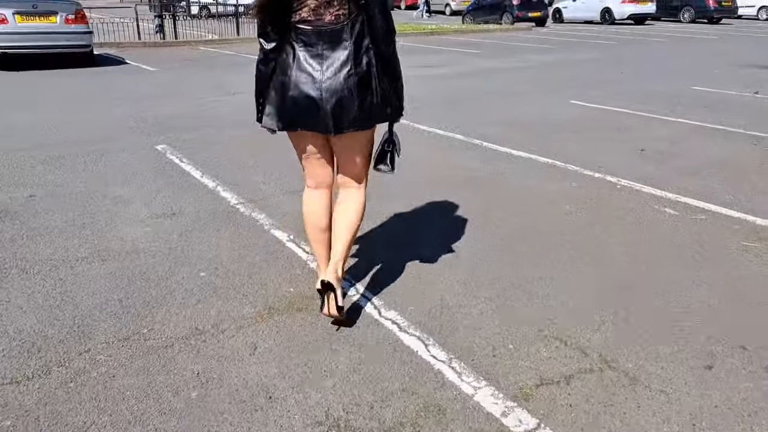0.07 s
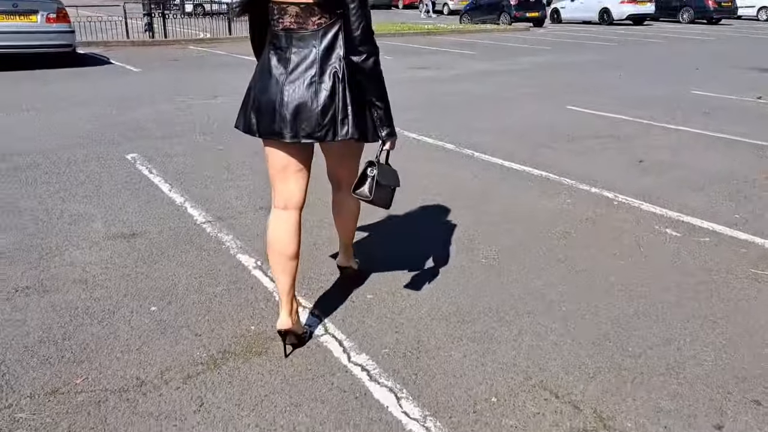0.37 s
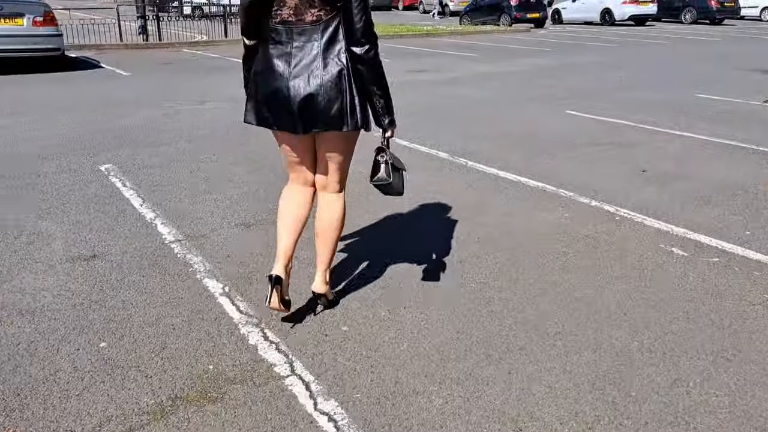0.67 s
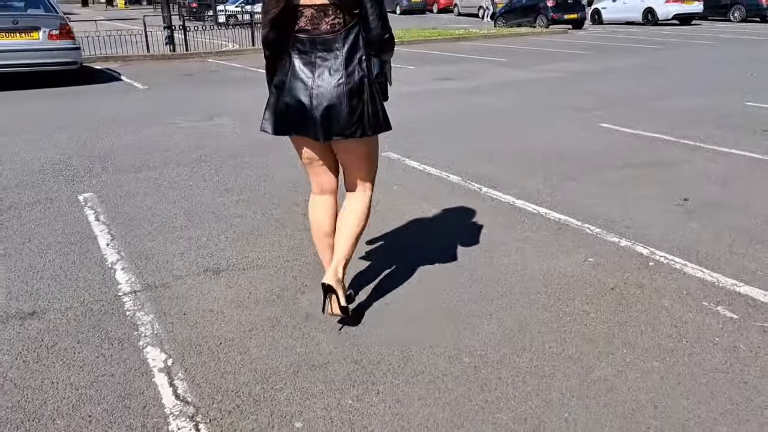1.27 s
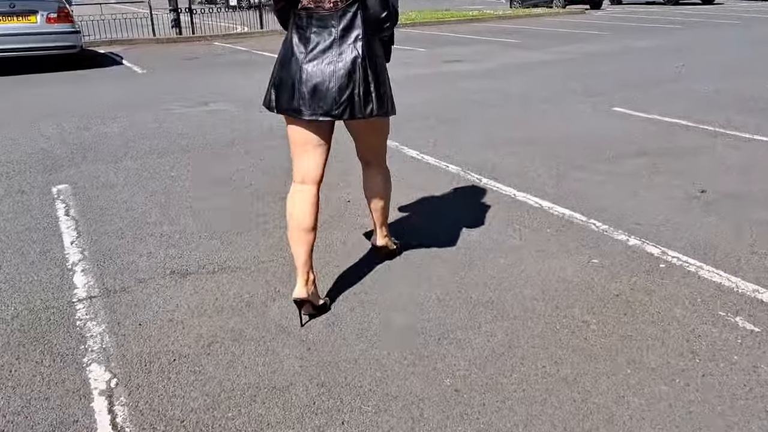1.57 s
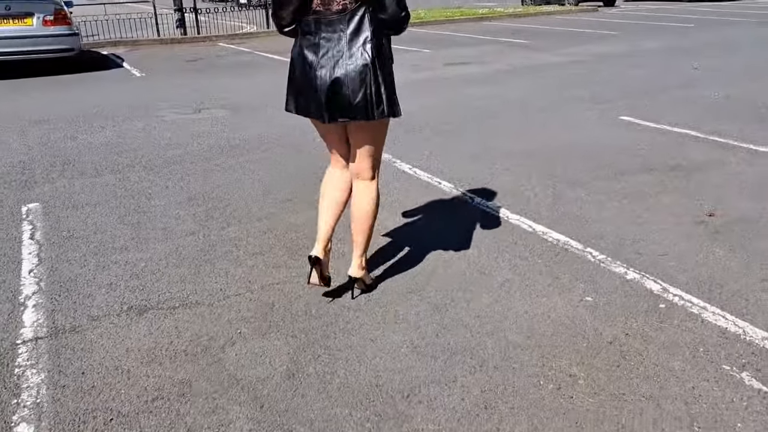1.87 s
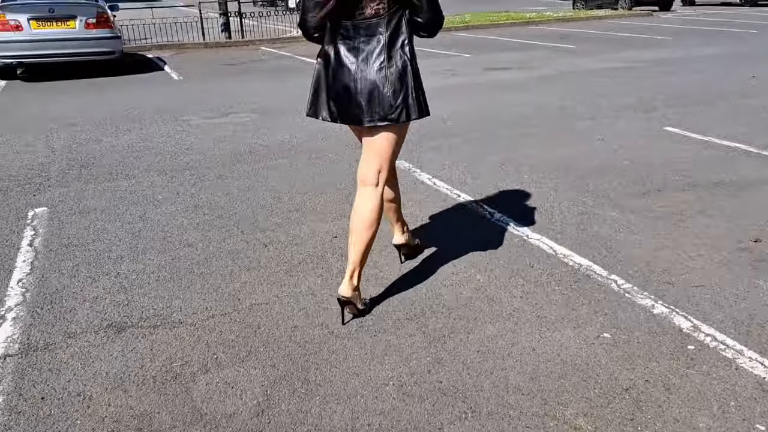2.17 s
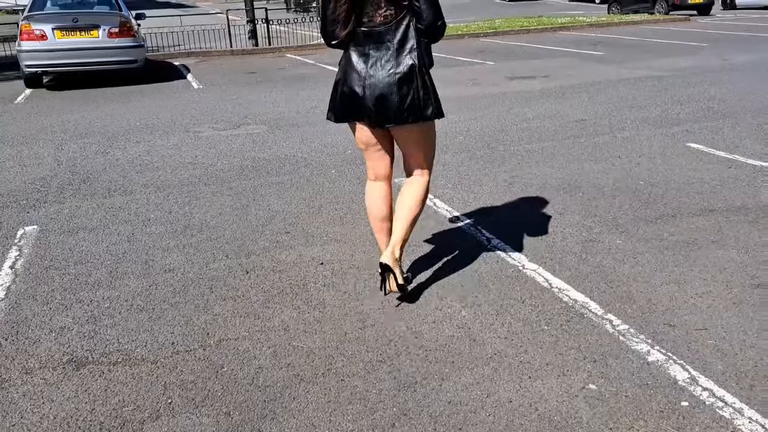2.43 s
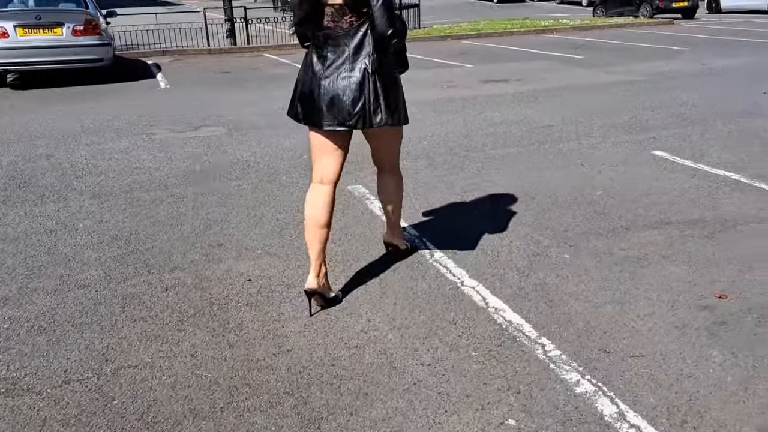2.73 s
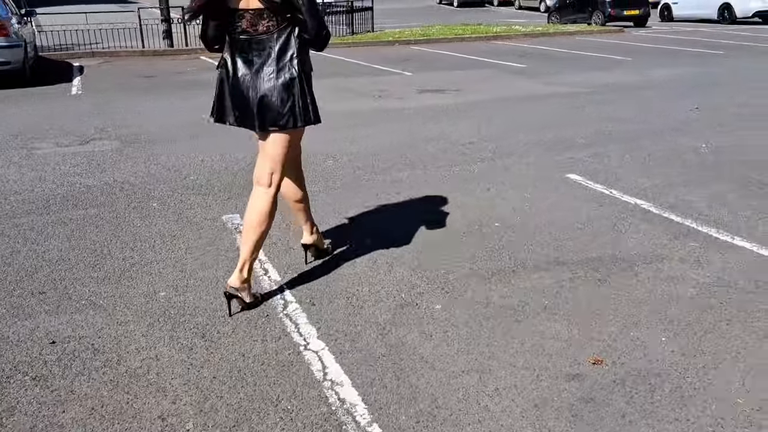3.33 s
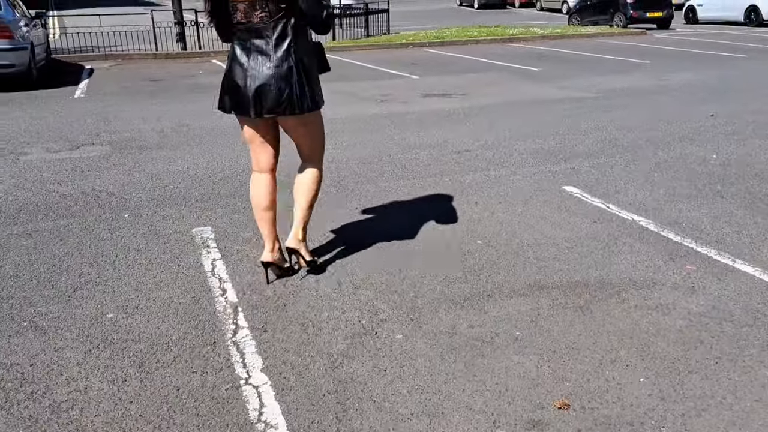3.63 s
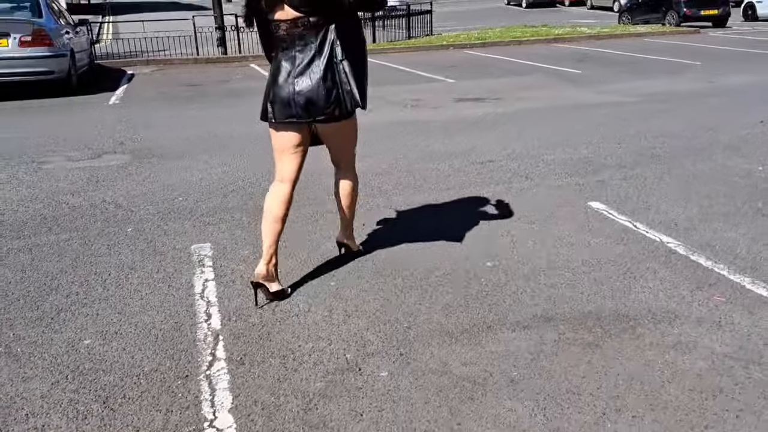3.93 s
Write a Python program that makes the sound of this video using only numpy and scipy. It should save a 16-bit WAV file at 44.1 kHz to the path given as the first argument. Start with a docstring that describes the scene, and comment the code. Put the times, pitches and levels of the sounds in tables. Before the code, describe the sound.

Light, sharp clicks of high heels move away over an outdoor car park, the soles scraping softly on grit. Far traffic hums underneath, while rising wind hits the microphone with low rumble and thuds.

```python
"""High heels click away over the asphalt of an open car park, with sole taps and gritty scuffs.
Each contact rings the heel, its hard tip and the grit under it. Wind rumbles on each microphone
port separately and, as the gust grows, slaps the ports in short buffets and deep thumps.
Distant traffic, a soft hiss and a few faint whistles lie underneath."""
import sys
import numpy as np
from scipy import signal
from scipy.fft import rfft, irfft
from scipy.io import wavfile
from scipy.ndimage import uniform_filter1d

SR = 44100
rng = np.random.default_rng(int(sys.argv[2]) if len(sys.argv) > 2 else 0)


def store_wav(level_fs):
    """Save 16-bit WAV to argv[1]."""
    pcm = np.round(np.clip(np.atleast_2d(level_fs), -1, 1) * 32767)
    wavfile.write(sys.argv[1], SR, pcm.T.astype(np.int16))


N = 176400

# Each row: start in seconds, body, tip and grit levels in dB, pitch factor.
SHOE_CONTACTS = [(0.0565, -29.5, -34, -24.5, .97), (0.062, -52, -54, -37, 0.89),
                 (0.1357, -53, -36.5, -34, 0.96), (0.5802, -38, -34.5, -54, 0.71),
                 (0.68, -30.5, -46, -38.5, 0.99), (1.3115, -60, -32, -37, 1.028),
                 (2.4737, -38.5, -31.5, -32.5, 1.04), (3.606, -68, -46, -37.5, 1.07),
                 (3.9770, -62, -50, -36.5, 1.07)]
# Heel body, hard tip, crushed grit. Each row: base frequency in Hz, T60 in seconds, relative dB.
BODY_MODES = [(1550, .006, -8), (2080, .008, -3), (2380, .014, 0)]
TIP_MODES = [(3160, 0.014, 0.5), (3580, 0.0068, 5), (4380, 0.0058, 6.5), (5940, 0.00071, -11)]
GRIT_MODES = [(6380, 0.0031, 1), (7750, 0.0029, 2), (9300, 0.00057, 7), (11000, 0.00034, 1)]


def heels():
    """Each contact is a sharp blow and a brief crunch that ring the shoe; then grit settles."""
    crunch_gain, crunch_s = .18, .0013
    settle_db, settle_s = -41, .016
    out, t = np.zeros((2, N + SR)), np.arange(SR // 10) / SR
    for start, *levels_db, pitch in SHOE_CONTACTS:
        i = int(start * SR)
        for side in range(2):
            crunch, grains = rng.standard_normal((2, len(t)))
            push = crunch_gain * crunch * np.exp(-t / crunch_s)
            push += undb(settle_db) * grains ** 3 / 2 * np.exp(-t / settle_s)
            push[0] += 1  # the blow
            for db, modes in zip(levels_db, (BODY_MODES, TIP_MODES, GRIT_MODES)):
                out[side, i:i + len(t)] += undb(db) * ring(push, modes, pitch)
    return out[:, :N] * pan(-1.5)


def ring(push, modes, pitch):
    """Damped modes driven by a push, band-passed around them; peak 1."""
    t = np.arange(len(push)) / SR
    response = sum(undb(db - 60 * t / t60) * np.sin(2 * np.pi * pitch * hz * t) for hz, t60, db in modes)
    skirt_ratio = 1.3
    low_hz = pitch * modes[0][0] / skirt_ratio
    high_hz = min(pitch * modes[-1][0] * skirt_ratio, SR / 2 - 1)
    band = signal.butter(2, [low_hz, high_hz], "band", fs=SR, output="sos")
    ringing = signal.sosfilt(band, signal.fftconvolve(push, response)[:len(t)])
    return ringing / np.abs(ringing).max()


# Each row: centre in seconds, half length in seconds, level in dB.
SOLE_SCUFFS = [(0.323, 0.015, -64), (1.145, 0.018, -61), (1.71, 0.046, -64), (1.788, 0.0091, -52.5),
               (2.301, 0.014, -56.5), (2.425, 0.083, -61.5), (2.893, 0.039, -60), (3.025, 0.016, -57.5),
               (3.635, 0.021, -64)]
# Each row: frequency in Hz, relative level in dB.
SCUFF_SPECTRUM = [(1500, -10), (4000, 4), (8000, 10.5), (10000, 10), (13500, 3.5), (16000, -19)]


def scuffs():
    """Soles rub over fine grit in short grainy swishes."""
    rub = sum(undb(db) * swell(centre, half) for centre, half, db in SOLE_SCUFFS)
    grain = flicker(rate_hz=980, depth_db=7)
    return rub * grain * np.array([noise(SCUFF_SPECTRUM), noise(SCUFF_SPECTRUM)])


# Wind on the ports. Each row: time in seconds, level in dB.
RUMBLE_LEFT = [(0, -39.5), (.56, -34.5), (.75, -42.5), (1.08, -36.5), (1.29, -23.5), (1.38, -30.5),
               (1.47, -40.5), (1.65, -32.5), (2.0, -29.5), (2.28, -24), (2.42, -29.5), (2.6, -23),
               (3.0, -28.5), (3.28, -32), (3.43, -21.5), (3.65, -29), (3.83, -38), (3.95, -25.5)]
RUMBLE_RIGHT = [(0, -37), (.38, -47), (.55, -35), (.75, -51.5), (.87, -41), (1.0, -44), (1.14, -27.5),
                (1.3, -31.5), (1.39, -33), (1.45, -93), (1.85, -38.5), (2.08, -30.5), (2.27, -27.5),
                (2.53, -28.5), (2.8, -44), (2.96, -68), (3.44, -52), (3.61, -31.5), (3.82, -88),
                (3.94, -28), (4, -34)]
FLUTTER_LEVEL = [(0, -55), (1.1, -59.5), (1.25, -48.5), (1.7, -50.5), (2.1, -60), (2.25, -39), (2.45, -48),
                 (2.75, -38.5), (2.95, -50), (3.04, -39.5), (3.11, -32.5), (3.22, -46), (3.31, -33),
                 (3.35, -45), (3.41, -22), (3.47, -24.5), (3.51, -35), (3.55, -23.5), (3.59, -49),
                 (3.9, -41.5)]
# Each row: frequency in Hz, relative level in dB.
RUMBLE_SPECTRUM = [(20, -9), (40, -9), (62, 3), (90, -8), (130, -1), (200, -9), (300, -14.5), (450, -24),
                   (700, -47.5), (1500, -85), (4000, -111)]
FLUTTER_SPECTRUM = [(100, -46), (220, -22.5), (320, 3.5), (440, 2), (600, -5), (850, -15), (1300, -26),
                    (2000, -38), (4000, -89)]


def wind():
    """Independent turbulence on each port: lumpy rumble and a higher flutter, mostly on the right."""
    rumble = np.array([curve(port) * turbulence(RUMBLE_SPECTRUM, rate_hz=40, depth_db=5)
                       for port in (RUMBLE_LEFT, RUMBLE_RIGHT)])
    flutter = np.array([undb(port_db) * turbulence(FLUTTER_SPECTRUM, rate_hz=90, depth_db=8.5)
                        for port_db in (-16, 0)])
    return rumble + curve(FLUTTER_LEVEL) * flutter


def turbulence(spectrum, rate_hz, depth_db, gust_s=.084):
    """Noise that is lumpy from moment to moment but even in strength over the span of a gust."""
    lumps = noise(spectrum) * flicker(rate_hz, depth_db)
    power = smooth(lumps ** 2, int(gust_s * SR))
    return lumps / np.sqrt(np.abs(power) + 1e-9)


# Each row: centre in seconds, half length in seconds, left and right levels in dB.
EDDY_SLAPS = [(2.35, 0.0029, -30, -31.5), (2.812, .004, -42, -33.5), (2.91, 0.0045, -55, -30),
              (3.003, 0.0026, -38.5, -24.5), (3.269, 0.0034, -31.5, -20.5), (3.408, 0.0033, -23.5, -17.5),
              (3.436, 0.0037, -18.5, -15.5), (3.547, 0.0036, -62, -29), (3.629, 0.0067, -59, -34),
              (3.734, 0.0023, -53, -31.5), (3.788, 0.003, -61, -34.5), (3.854, 0.0036, -56, -34),
              (3.952, 0.011, -34, -36)]


def buffets():
    """Eddies hit the ports with a hollow thud and a rough wake; small, one-sided ones are brighter."""
    port_hz, port_gain = 403, 1.05
    wake_db, wake_s = -10.5, .034
    out, t = np.zeros((2, N)), np.arange(N) / SR
    for centre, half, left_db, right_db in EDDY_SLAPS:
        envelope = swell(centre, half)
        onset = (1 + np.tanh((t - centre) / half)) / 2
        wake = undb(wake_db) * onset * np.exp(-np.abs(t - centre) / wake_s)
        treble_db = .4 * abs(right_db - left_db)
        spectrum = [(hz, db + treble_db * np.clip(np.log2(hz / 500), 0, 1))
                    for hz, db in FLUTTER_SPECTRUM]
        resonance = port_gain * np.sin(2 * np.pi * (port_hz * t + rng.random()))
        for side, db in enumerate((left_db, right_db)):
            air = noise(spectrum)
            thud = envelope * (air + resonance)
            thud *= np.sqrt(np.sum(envelope ** 2) / np.sum(thud ** 2))
            out[side] += undb(db) * (thud + wake * air)
    return out


# Each row: centre in seconds, frequency in Hz, level in dB.
LARGE_EDDIES = [(0.331, 90, -30), (.54, 170, -28), (.6, 70, -27), (.885, 70, -31.5), (1.286, 59.9, -21.5),
                (2.251, 60, -17), (2.312, 74.7, -16), (2.485, 110, -23), (2.59, 180, -21.5),
                (2.791, 139.6, -17), (3.266, 70.3, -23.5), (3.412, 200, -15), (3.708, 307, -28.5),
                (3.915, 227.8, -24), (3.948, 180, -19.5)]


def thumps():
    """Large eddies roll over the whole microphone: a cycle or two of deep pressure swing."""
    t, half_length_cycles = np.arange(N) / SR, .4
    pressure = np.zeros(N)
    for centre, hz, db in LARGE_EDDIES:
        swing = np.sin(2 * np.pi * (hz * t + rng.random()))
        pressure += undb(db) * swell(centre, half_length_cycles / hz) * swing
    return pressure * pan(4.5)


# Each row: frequency in Hz, relative level in dB.
TRAFFIC_SPECTRUM = [(40, -46), (200, 9), (400, 5), (650, -4.5), (1000, -4.5), (1400, -14), (2100, -13),
                    (3000, -15.5), (6000, -20), (16000, -82)]
TYRE_SPECTRUM = [(300, -15.5), (700, 3), (1100, 5.5), (1600, 0), (2400, -12.5), (6000, -32.5)]
# Each row: time in seconds, level in dB.
TRAFFIC_LEVEL = [(0, -48), (1.5, -48.5), (2.9, -47), (3.4, -49.5), (3.85, -54), (4, -49.5)]


def traffic():
    """Far traffic all around, plus tyre roar from a road on the right that reaches the left port later."""
    tyre_db, left_lag_s = -7.5, .00043
    diffuse = np.array([undb(port_db) * noise(TRAFFIC_SPECTRUM) * flicker(rate_hz=10, depth_db=1)
                        for port_db in (-2.5, -.7)])
    tyres = undb(tyre_db) * noise(TYRE_SPECTRUM)
    road = np.array([np.roll(tyres, int(left_lag_s * SR)), tyres])
    return curve(TRAFFIC_LEVEL) * (diffuse + road)


# Each row: frequency in Hz, relative level in dB.
HISS_SPECTRUM = [(1000, 12), (2500, 4), (5000, -0.5), (6600, -2), (8000, 2), (9000, -4), (11000, -4.5),
                 (12700, -3), (16000, -8)]
# Each row: frequency in Hz, left minus right in dB.
HISS_PAN = [(1000, -3.5), (2500, 4.5), (4500, -8), (8000, -3.5), (12000, 0.5)]
# Each row: time in seconds, level in dB.
HISS_LEVEL = [(0, -56), (.3, -55), (.95, -57), (1.3, -53), (1.5, -60), (1.75, -54), (2.05, -56),
              (2.35, -52.5), (2.65, -54.5), (2.95, -54.5), (3.25, -58), (3.83, -61.5)]


def hiss():
    """A wide, airy hiss, independent on each side."""
    sides = np.array([colour(noise(HISS_SPECTRUM), HISS_PAN, share) for share in (.5, -.5)])
    return curve(HISS_LEVEL) * sides


# Each row: centre in seconds, half length in seconds, centre frequency in Hz, level in dB.
FAR_SQUEALS = [(1.07, 0.044, 2140, -64), (2.01, 0.13, 2125, -64.5), (2.243, 0.062, 2360, -61.5),
               (2.861, 0.073, 2086, -61.5)]


def whistles():
    """Falling squeals, perhaps birds or brakes, blurred by distance and wind into narrow noise bands."""
    sag_hz_per_s, blur_hz = 240, 220
    out, t = np.zeros((2, N)), np.arange(N) / SR
    for centre, half, hz, db in FAR_SQUEALS:
        phase = 2 * np.pi * np.cumsum(hz - sag_hz_per_s * (t - centre)) / SR
        blur = smooth(rng.standard_normal((2, 2, N)), int(SR / blur_hz))
        squeal = unit(blur[0] * np.cos(phase) + blur[1] * np.sin(phase))
        out += undb(db) * swell(centre, half) * squeal
    return out


def undb(db):
    """Decibels to gain."""
    return 10 ** (np.asarray(db) / 20)


def unit(x):
    """Scale to rms 1."""
    return x / np.sqrt(np.mean(x ** 2))


def pan(left_minus_right_db):
    """Left and right gains."""
    return undb(left_minus_right_db * np.array([[.5], [-.5]]))


def smooth(x, samples):
    """Two passes of a moving average."""
    return uniform_filter1d(uniform_filter1d(x, samples), samples)


def curve(rows):
    """Gain over time from (s, dB) rows."""
    return undb(np.interp(np.arange(N) / SR, *np.array(rows).T))


def swell(centre_s, half_s):
    """Gaussian envelope; the half length is its standard deviation."""
    return np.exp(-.5 * ((np.arange(N) / SR - centre_s) / half_s) ** 2)


def colour(x, spectrum, share=1):
    """Filter by (Hz, dB) rows; share scales the dB."""
    hz, db = np.array(spectrum).T
    bins_hz = np.arange(N // 2 + 1) * SR / N
    gain_db = share * np.interp(np.log(bins_hz + 1), np.log(hz), db)
    return irfft(rfft(x) * undb(gain_db), N)


def noise(spectrum):
    """Coloured noise of rms 1."""
    return unit(colour(rng.standard_normal(N), spectrum))


def flicker(rate_hz, depth_db):
    """Randomly wavering gain of rms 1."""
    hold = max(int(SR / rate_hz), 1)
    stairs = rng.standard_normal(N)[np.arange(N) // hold]
    ramps = unit(uniform_filter1d(stairs, hold))
    return unit(undb(depth_db * ramps))


def scene():
    """Footsteps in the wind over far traffic."""
    return heels() + scuffs() + wind() + buffets() + thumps() + traffic() + hiss() + whistles()


def record(dry):
    """Steep low-pass on the top treble."""
    cutoff_hz = 15850
    return signal.sosfilt(signal.ellip(10, .2, 80, cutoff_hz, fs=SR, output="sos"), dry)


dry = scene()
out = record(dry)
store_wav(out)
```